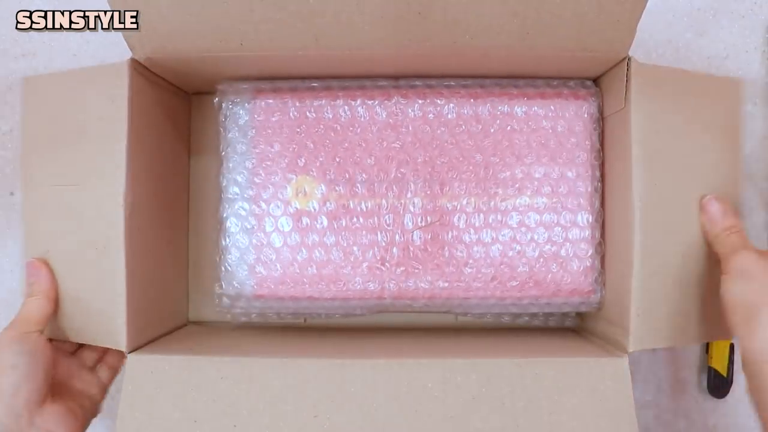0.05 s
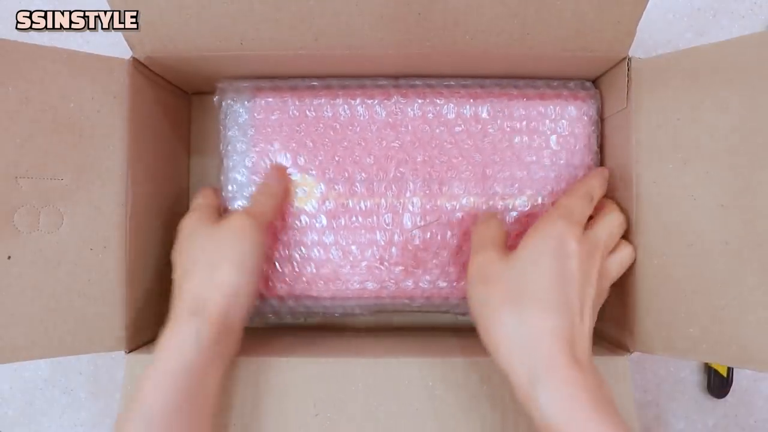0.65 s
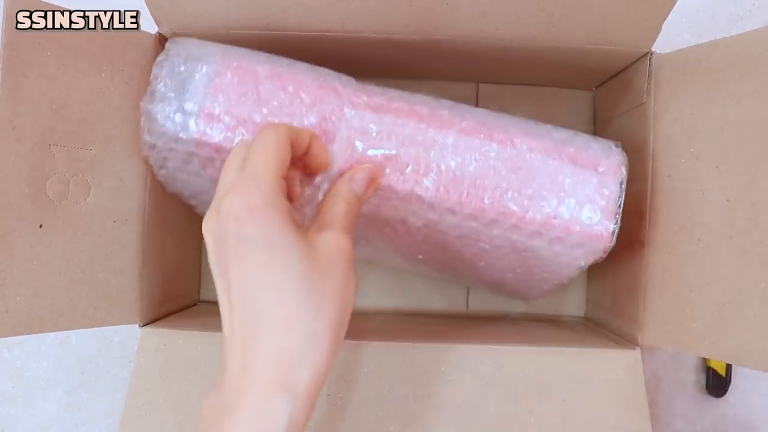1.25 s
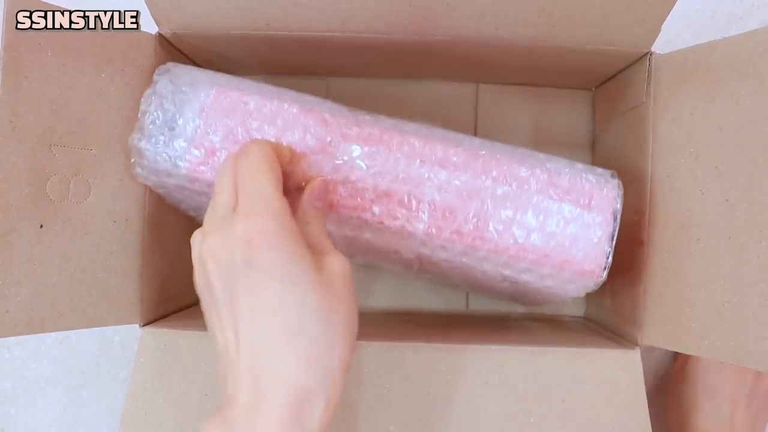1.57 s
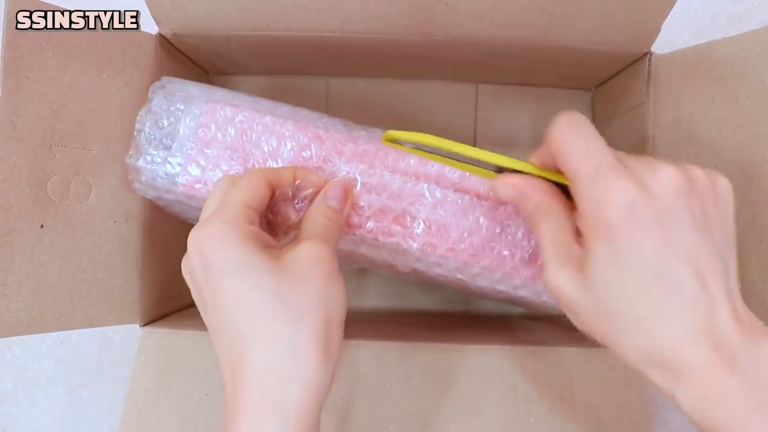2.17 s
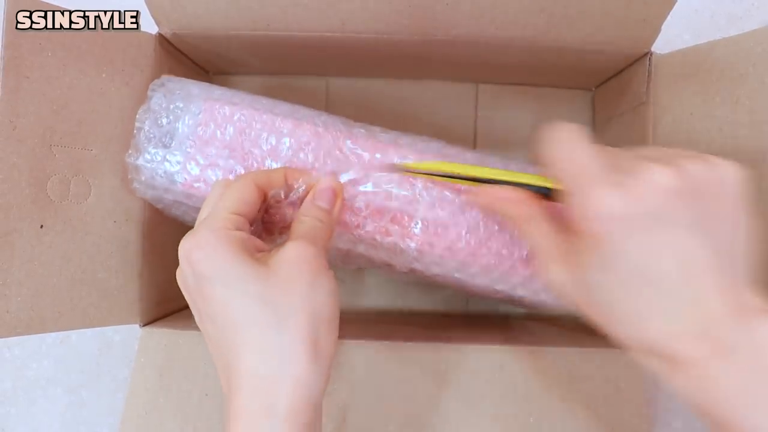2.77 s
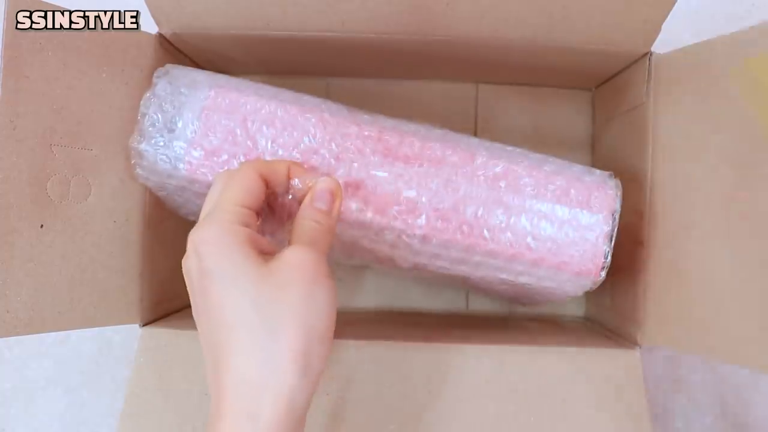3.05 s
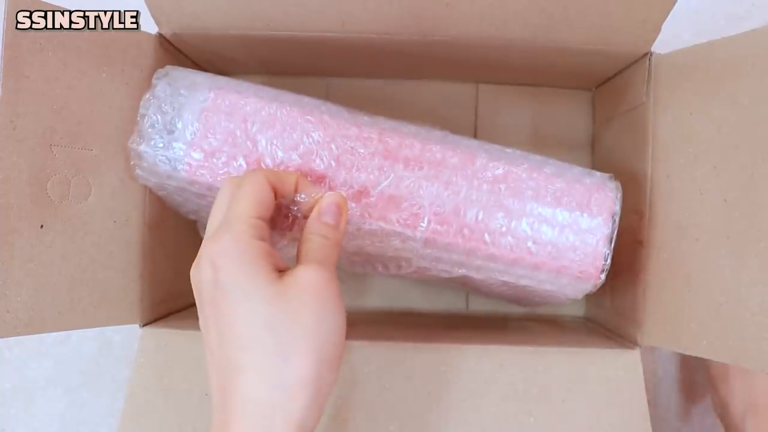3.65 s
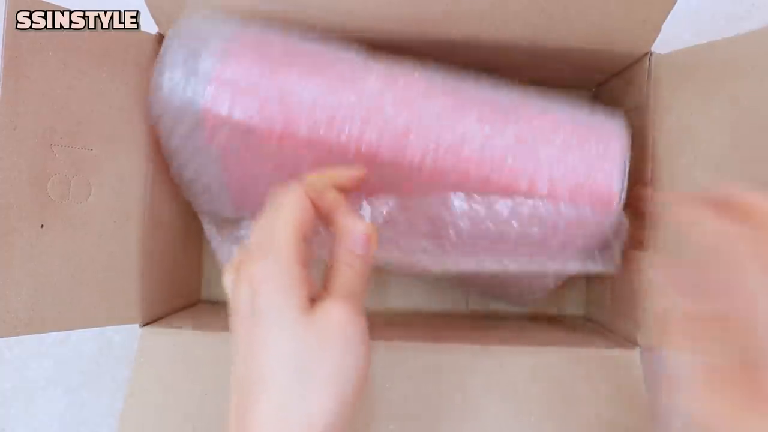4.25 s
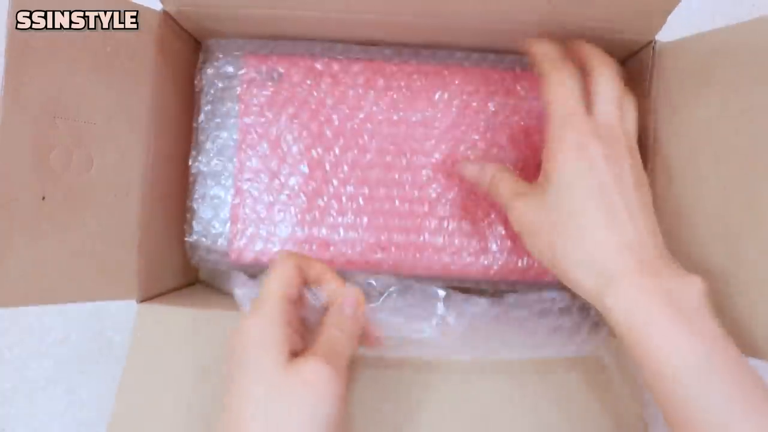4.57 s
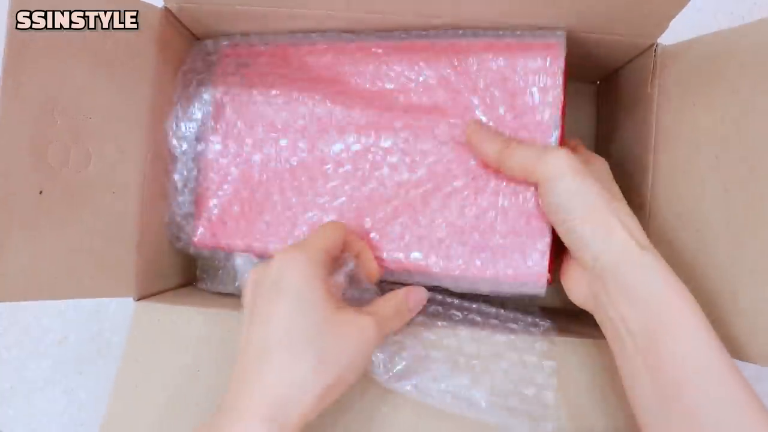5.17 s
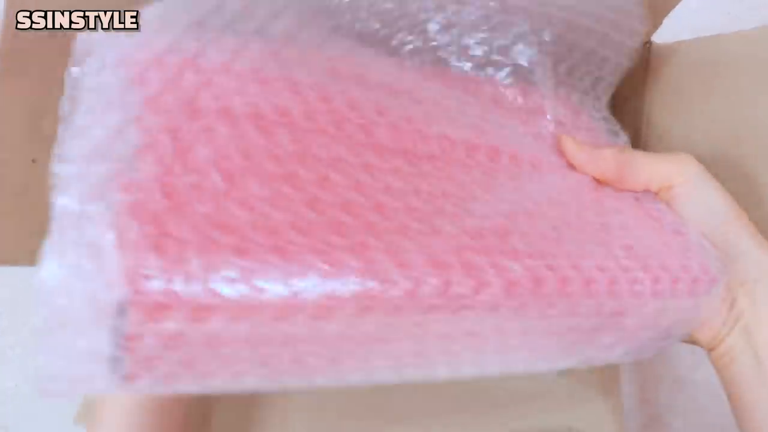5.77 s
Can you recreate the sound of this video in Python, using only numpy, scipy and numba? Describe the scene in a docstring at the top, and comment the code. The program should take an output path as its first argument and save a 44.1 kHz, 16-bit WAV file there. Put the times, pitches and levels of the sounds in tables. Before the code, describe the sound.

Everything is close to the microphone in a small, quiet room. A faint rustle opens, and a knife is put down with a light clack at about 0.4 seconds. Until 1.1 seconds, hands grip a bubble-wrapped parcel, crinkling the plastic and bumping it dully against a cardboard box. Softer rustles and ticks follow. From 2.1 to 2.6 seconds a snap-off knife ratchets out in a run of bright clicks. Around 2.8 to 3.1 seconds it slits the wrap with loud, sharp snaps and small hollow pops. After a lull with faint ticking, the blade ratchets back quickly at 3.8 seconds, and the knife hits the floor with a loud, bouncing clack near 4.2 seconds. The wrap is then pulled open in dense, sustained crinkling, with thumps, taps and cardboard scuffs around 4.4 to 5.2 seconds. Brief low cardboard groans come as the parcel slides out, the crinkling easing near 6 seconds.

```python
"""Unpacking a bubble-wrapped parcel

Hands lift the parcel in a cardboard box, close to the microphone in a small room. The film crinkles
as its creases buckle; the parcel excites the box by impact and by stick-slip friction. A snap-off
knife is put down and later ratcheted out; it slits the film, is ratcheted back and is dropped on
the floor. Then the wrap is pulled open and the parcel drawn out."""
import sys
import numpy as np
from scipy import signal
from scipy.fft import rfft, irfft
from scipy.io import wavfile
from scipy.ndimage import uniform_filter1d, minimum_filter1d
from numba import njit

SR = 44100
rng = np.random.default_rng(int(sys.argv[2]) if len(sys.argv) > 2 else 0)


def to_wav(s):
    """Save 16-bit WAV."""
    ch = np.atleast_2d(s).T  # columns
    pcm = np.round(np.clip(ch, -1, 1) * 32767)  # PCM
    wavfile.write(sys.argv[1], SR, pcm.astype(np.int16))


N = 260190
TIME = np.arange(N) / SR

# The knife's slider on its way out and back:
# (time [s], treble [dB], left minus right [dB], blade buzz relative to the notch [dB])
SLIDER_TRAVEL = [(2.05, -15, 10, -29), (2.1, 0.5, 4, -26), (2.24, -1, 0.5, -35), (2.56, -10.5, 0, -35),
                 (3.81, 12.5, 10, -16.5), (3.95, 5.5, 1, -12.5)]


def undb(db):
    """Amplitude ratio of a level in decibels."""
    return 10 ** (np.asarray(db) / 20)


def unit(x):
    """Normalisation to an rms of 1."""
    return x / np.sqrt(np.mean(x ** 2))


def with_energy(x, seconds):
    """Normalisation of a burst to the energy of that many seconds at an rms of 1."""
    return x * np.sqrt(seconds * SR / np.mean(np.sum(x ** 2, axis=-1)))


def band(x, lo_hz, hi_hz, order=2):
    """Causal Butterworth band-pass."""
    edges = np.clip([lo_hz, hi_hz], 10, .48 * SR)
    return signal.sosfilt(signal.butter(order, edges, "band", fs=SR, output="sos"), x)


def colour(x, points):
    """Spectral shaping through points of (frequency [Hz], gain [dB])."""
    hz, db = np.transpose(points)
    freqs = np.arange(N // 2 + 1) * SR / N
    return irfft(rfft(x) * undb(np.interp(np.log(freqs + 1), np.log(hz), db)), N)


def stereo_noise(shape, correlation):
    """Partial coherence: left and right noise share a common part."""
    mid, side = rng.standard_normal((2, *shape))
    return np.sqrt((1 + correlation) / 2) * mid + np.sqrt((1 - correlation) / 2) * np.array([side, -side])


def wander(per_s):
    """Random drift: linear interpolation between Gaussian values."""
    step = int(SR / per_s)
    return uniform_filter1d(np.repeat(rng.standard_normal(N // step + 1), step), step)[:N]


def add(out, s, sound, pan_db=0):
    """Superposition of a sound at time s, placed by a left-minus-right level difference."""
    i = int(s * SR)
    part = (sound * undb(np.array([[pan_db], [-pan_db]]) / 2))[:, :N - i]
    out[:, i:i + part.shape[1]] += part


def ring(modes, t):
    """Free vibration of damped modes: (frequency [Hz], level [dB], T60 [s])."""
    return sum((-1) ** k * undb(db) * np.sin(2 * np.pi * hz * t) * undb(-60 * t / t60)
               for k, (hz, db, t60) in enumerate(modes))


def resound(x, modes):
    """Forced vibration: convolution with the modes' impulse response, at the rms of the drive."""
    response = signal.oaconvolve(x, ring(modes, TIME[:12000])[None], axes=1)[:, :N]
    return unit(response) * np.sqrt(np.mean(x ** 2))


@njit
def resonate(x, hz, width):
    """Second-order resonance with a moving centre frequency; width is 1/Q."""
    y, band_state, low_state = np.empty(len(x)), 0., 0.
    for i in range(len(x)):
        g = np.tan(np.pi * hz[i] / SR)
        passed = (band_state + g * (x[i] - low_state)) / (1 + g * (g + width))
        band_state = 2 * passed - band_state
        low_state += 2 * g * passed
        y[i] = width * passed
    return y


def grains(per_s, spread_db, cap_db, decay_s, bed, correlation, lo_hz, hi_hz, bands):
    """Shot noise: tiny clicks, many weak and a few strong, over a steady bed of noise."""
    total = int(per_s * N / SR)
    onsets = rng.integers(0, N, total)
    size = undb(np.minimum(spread_db * rng.exponential(size=total), cap_db))
    edges = np.geomspace(lo_hz, hi_hz, bands + 1)
    out = 0
    for lo, hi in zip(edges, edges[1:]):
        amplitudes = size * undb(3.5 * rng.standard_normal((2, total)))  # own colour and place per click
        power = np.array([np.bincount(onsets, side ** 2, N) for side in amplitudes])
        power = signal.lfilter([1], [1, -np.exp(-2 / (decay_s * SR))], power + 1e-12)
        # the hand works evenly, so only the quick crackle stays random
        power = power / uniform_filter1d(power + 1e-6, size=4000, axis=1)
        out = out + band(np.sqrt(power + bed) * stereo_noise((N,), correlation), lo, hi)
    return out


def clicks(table, rise_s, decay_s, cycles, crack_db, low_hz, correlation,
           lag_s=0, sag_per_s=0, reach_hz=2500):
    """Impulse excitation: each click is a resonance dying in a few cycles under a broadband crack."""
    out, t = np.zeros((2, N)), TIME[:1024]
    age = np.maximum(t - np.array([[0], [lag_s]]), 0)  # arrives lag_s later on the right
    attack = 1 - np.exp(-(age / rise_s) ** 2)
    envelope = attack * np.exp(-age / decay_s)
    for s, db, hz, treble_db, pan_db in table:
        pitch = hz * np.exp(-sag_per_s * undb(db) * (age - 2 * rise_s))  # harder clicks sag faster
        phase = 2 * np.pi * np.cumsum(pitch * (age > 0), axis=1) / SR
        tone = np.sin(phase) * attack * np.exp(-age * hz / cycles)
        burst = envelope * stereo_noise(t.shape, correlation)
        crack = band(burst, max(low_hz, .4 * hz), max(2 * hz, reach_hz))
        body = unit(tone) + undb(crack_db) * unit(crack)
        treble = band(envelope * stereo_noise(t.shape, correlation / 2), 6200, 16000, order=3)
        add(out, s, undb(db) * with_energy(unit(body) + undb(treble_db) * unit(treble), .002), pan_db)
    return out


def room_tone(level_db=-60.5):
    """Ambient noise: steady, partly coherent and strongest in the bass."""
    # Background spectrum: (frequency [Hz], gain [dB])
    spectrum = [(25, -27), (58, 2.5), (90, 4.5), (150, 1), (223, 8), (300, -6), (650, -14), (7000, -31),
                (16000, -70)]
    return undb(level_db) * unit(colour(stereo_noise((N,), 0.55), spectrum))


def effort(starts, lengths, levels_db, held_db, relax_db_per_s):
    """Incoherent summation: the hand strokes add their power to that of the held wrap, giving dB."""
    power = undb(held_db) ** 2
    for start_s, length_s, db in zip(starts, lengths, levels_db):
        age = TIME - start_s
        grip_s = 0.021 + 0.17 * length_s
        attack = np.sin(np.pi / 2 * np.clip(age / grip_s, 0, 1)) ** 2
        fall_db_per_s = relax_db_per_s * (1 + 0.01 / length_s)  # short scrunches settle faster
        release = undb(-fall_db_per_s * np.maximum(age - length_s, 0))
        power = power + (undb(db) * attack * release) ** 2
    return 10 * np.log10(power)


def wall_echoes(x):
    """Comb filtering: the box walls return early echoes whose paths change as the parcel moves."""
    out = x
    for delay_s in (.0011, .0018, .0029):
        path_s = delay_s * (1 + .16 * wander(4))
        out = out + .24 * np.array([np.interp(TIME - path_s, TIME, side) for side in x])
    return out


def crinkle(level_db, sizzle_db, slides_s=4.38):
    """Buckling: countless creases click; hard rubbing and sliding film merge them into a rush."""
    # Spectrum of the film: (frequency [Hz], gain [dB])
    spectrum = [(200, 2.5), (500, -24), (1000, 4), (1700, 10), (2400, 9.5), (3600, 6.5), (5000, -0.5),
                (7000, -11.5), (9000, -11.5), (11300, -15.5), (13000, -14), (16000, -22)]
    # Resonance of the film under the fingers: (time [s], frequency [Hz], strength [dB])
    fold_track = [(.47, 2200, 1), (.7, 2100, 2.5), (.92, 2060, 10.5), (1.09, 2070, -12.5), (1.16, 2800, 7),
                  (1.3, 3000, -13), (1.55, 3160, 13), (2.85, 2580, 13.5), (3.1, 2590, -9),
                  (4.301, 3860, -10.5), (5.1, 1300, -13), (5.45, 3060, -14.5), (5.75, 1870, 3.5)]
    sliding = np.clip((TIME - slides_s) / .1, 0, 1)
    rush = .2 + (.4 + 1.1 * sliding) * undb(level_db + 30)
    crackle = grains(per_s=900, spread_db=4.6, cap_db=16, decay_s=.0008, bed=rush, correlation=.1,
                     lo_hz=250, hi_hz=18000, bands=6)
    film = wall_echoes(colour(crackle / np.sqrt(1 + rush), spectrum))
    s, hz, db = np.transpose(fold_track)
    fold_hz, fold_gain = np.interp(TIME, s, hz), undb(np.interp(TIME, s, db))
    film = film + fold_gain * np.array([resonate(side, fold_hz, width=.4) for side in film])
    coarse = undb(0.98) * unit(band(film, 150, 6500, order=4)) / np.sqrt(1 + fold_gain)
    fine = undb(sizzle_db - 4) * unit(band(film, 6500, 19000, order=4))
    catching_db = 1.5 * wander(60)  # the film catches and lets go
    return undb(level_db + catching_db) * (coarse + fine)


def creases(level_db, per_s=40):
    """Isolated buckling: single creases tick at random, even while the wrap is only held."""
    out, t = np.zeros((2, N)), TIME[:256]
    for when, size, pitch, place in rng.uniform(size=(int(per_s * N / SR), 4)):
        i = int(when * (N - len(t)))
        db = .7 * min(level_db[i], -32) - 22 + 17 * size ** 3
        tone = np.sin(2 * np.pi * 2500 * 4 ** pitch * t)
        tick = (stereo_noise(t.shape, .3) + tone) * np.exp(-t / .0004)
        add(out, i / SR, undb(db) * with_energy(tick, .002), pan_db=10 * (place - .5))
    return band(out, 1800, 4900, order=1)


def scuff(level_db, flap_db=-9):
    """Sliding friction: the parcel drags over cardboard in small slips; hard drags ring the flaps."""
    # Spectrum of rubbed cardboard: (frequency [Hz], gain [dB])
    spectrum = [(120, -25.5), (220, -6), (330, 5.5), (620, -2), (1100, -1.5), (1700, -6), (3000, -17.5)]
    # Modes of the box flaps: (frequency [Hz], level [dB], T60 [s])
    flap_modes = [(701, -1, .11), (730, -2, .13), (796, 0, .12), (1000, 1, .1)]
    slips = grains(per_s=350, spread_db=3.5, cap_db=8, decay_s=.003, bed=.2, correlation=.85,
                   lo_hz=120, hi_hz=3500, bands=2)
    drag = undb(level_db - 5) * unit(colour(slips, spectrum))
    hardness = np.clip((level_db + 45) / 15, 0, 1)
    return drag + undb(flap_db) * resound(drag * hardness, flap_modes)


def snaps_and_taps():
    """Transient excitation: taut film snaps and corners tap the box; the air cushions answer low."""
    # Stretched film gives way; the broad clack at 4.26 s is the parcel flipping over: (time [s], level [dB],
    # resonance [Hz], treble [dB], left minus right [dB])
    snaps = [(0.3252, -32, 6800, -23, -10), (0.698, -25.5, 1680, -24, -7), (0.758, -22.5, 3500, 1, -3),
             (0.8327, -26, 2300, -27, -7), (0.9226, -16, 2380, -31, -5), (0.9272, -17, 2340, -27, -2),
             (0.9864, -19.5, 2310, -28, -1), (1.4032, -33.5, 6060, -6, -1), (1.4375, -20, 5730, 0, 1),
             (1.5819, -25, 4500, -26, -3), (1.6093, -24.5, 4260, -15, -2), (1.8324, -31.5, 3720, 16, -1),
             (2.005, -39, 2150, 2, 3), (2.6691, -36, 5340, 4.5, -1), (2.8056, -27, 2400, -9, -9),
             (2.8251, -5, 2244, -6, 3), (2.834, -10.5, 2730, -4.5, -7), (2.862, -25, 2590, -19, -6),
             (2.911, -12, 2620, -37, -1), (2.9173, -16.5, 2570, -8, 1), (2.928, -18, 2900, -24, -5),
             (2.9391, -15.5, 3500, -1, 4), (2.9616, -21, 2440, -25, -4), (2.9793, -15.5, 2540, -14, 1.5),
             (3.0156, -5.5, 2500, -8, -1), (3.091, -21, 1940, -7.5, 6), (3.516, -41, 3220, 5, -1),
             (3.5614, -26.5, 7240, -4, 8), (4.225, -24, 2270, -13, 2), (4.2626, -8.5, 2020, -8.5, -2),
             (4.591, -17, 3630, -27, -3), (5.0907, -21, 3100, -16, -5)]
    # A corner of the parcel meets the cardboard: columns as for the snaps
    taps = [(0.5157, -21, 746, -8.5, 7), (4.649, -11, 825, -32, -2), (4.8446, -17, 815, -11, 1),
            (4.977, -24, 1080, -19, -4), (5.1798, -10, 1390, -14.5, 0)]
    out = clicks(snaps, rise_s=0.000373, decay_s=0.0011, cycles=1.87, crack_db=-1.5, low_hz=800,
                 correlation=0.61, lag_s=.00003, sag_per_s=1130, reach_hz=4560)
    out += clicks(taps, rise_s=0.00036, decay_s=0.0012, cycles=2, crack_db=-1.5, low_hz=400,
                  correlation=0.69)
    cushion = ring([(351, 7.5, 0.019), (1040, 3, 0.02)], TIME[:3000])
    for s, db, hz, _, pan_db in snaps + taps:
        coupling = min(2200 / hz, 1) ** 2
        add(out, s, undb(db - 15.5) * coupling * cushion, pan_db)
    return band(out, 282, 13200, order=3)


def knife_impacts():
    """Impact and rebound: the knife clacks and rings in its modes while the ground thuds."""
    # The knife is put down, later lands and bounces:
    # (time [s], level [dB], resonance [Hz], treble [dB], left minus right [dB], ground thud [dB])
    landings = [(0.356, -11, 1760, -12, -3.5, -46), (4.1562, -2.5, 3420, -10.5, 10, -16),
                (4.165, -12.5, 3200, -22, -5, -22.5), (4.177, -13, 3860, -22, 10, -38),
                (4.185, -17.5, 3800, -25, 0, -50)]
    # Modes of the knife: (frequency [Hz], level [dB], T60 [s])
    knife_modes = [(350, 18, .18), (651, 17, .2), (1750, 2, .13), (5300, -1, .15)]
    out = clicks([row[:-1] for row in landings], rise_s=0.0001, decay_s=0.0019, cycles=2.5,
                 crack_db=3.5, low_hz=1150, correlation=0.22, lag_s=.00009, reach_hz=5660)
    thud = ring([(340, -1.1, 0.016), (610, -1, 0.007), (1090, 2, 0.01)], TIME[:3000])
    for s, _, hz, _, pan_db, thud_db in landings:
        # modes weaken by 12 dB per octave of distance from the clack
        excited = [(f, db - 12 * abs(np.log2(f / hz)), t60) for f, db, t60 in knife_modes]
        add(out, s, undb(-35) * ring(excited, TIME[:12000]), pan_db)
        add(out, s, undb(thud_db) * thud)
    return band(out, 220, 19000)


def bumps(below_db_per_octave=4, above_db_per_octave=9, shudder_s=0.047, contact_s=0.0014):
    """Modal response: a soft blow swings the wall once and rings nearby box modes; the flaps shudder."""
    # The parcel bumps the box: (time [s], level [dB], centre frequency of the push [Hz])
    blows = [(0.533, -23, 152), (0.554, -24, 110), (0.724, -31, 188), (0.769, -27, 118),
             (0.823, -16.5, 175), (0.991, -29.5, 119), (3.095, -35, 86), (4.386, -24, 180),
             (4.486, -30, 180), (4.638, -13.5, 142), (4.678, -23, 191), (4.723, -22, 193),
             (4.845, -14, 198), (4.89, -24, 157), (4.976, -29.5, 231), (5.648, -31.5, 88)]
    # Modes of the box: (frequency [Hz], level [dB], T60 [s])
    box_modes = [(59.7, -6.5, 0.27), (98.3, 4.5, 0.12), (117.4, 7, 0.035), (162.7, 1.5, 0.097),
                 (239.4, -8, 0.15), (303.7, 0, 0.18), (403, 3.5, 0.11)]
    mode_hz, mode_db, t60 = np.transpose(box_modes)
    out, t = np.zeros((2, N)), TIME[:12000]
    for s, db, hz in blows:
        octaves = np.log2(mode_hz / hz)
        excited_db = mode_db + octaves * np.where(octaves < 0, below_db_per_octave, -above_db_per_octave)
        tone = ring(zip(mode_hz, excited_db, t60), t) * (1 - np.exp(-t / contact_s))
        push = np.sin(2 * np.pi * hz * t) * t * np.exp(-2 * hz * t)
        shudder = band(rng.standard_normal(len(t)) * np.exp(-t / shudder_s), hz / 3, hz * 2.2)
        thud = unit(tone) + undb(-1) * unit(push) + undb(-8) * 160 / hz * unit(shudder)
        add(out, s, undb(db) * with_energy(thud, 0.011))
    return band(out, 51, 3100, order=4)


def groans():
    """Stick-slip oscillation: uneven slips at a rising rate make the cardboard hum; the wall rings on."""
    # The parcel's edge judders along a wall:
    # (time [s], duration [s], start rate [Hz], end rate [Hz], level [dB])
    judders = [(0.881, 0.024, 300, 317, -28), (5.52, 0.012, 238, 280, -25), (5.63, 0.024, 275, 310, -23),
               (5.702, 0.064, 267, 350, -29.5)]
    # Mode of the box wall: (frequency [Hz], level [dB], T60 [s])
    wall_modes = [(284.6, 0, 0.16)]
    out = np.zeros((2, N))
    for s, length_s, start_hz, end_hz, db in judders:
        progress = np.linspace(0, 1, int(length_s * SR))
        hum = np.sin(2 * np.pi * np.cumsum(start_hz + (end_hz - start_hz) * progress) / SR)
        rasp = unit(band(rng.standard_normal(len(progress)), end_hz / 2, end_hz * 1.6))
        add(out, s, undb(db) * unit(np.sin(np.pi * progress) * (hum + .3 * rasp)))
    return out + undb(-6.5) * resound(out, wall_modes)


def notches():
    """The ratchet's impulse train: each notch takes its treble and place from the slider's travel."""
    # The slider jumps a notch: (time [s], level [dB], handle resonance [Hz])
    jumps = [(2.0532, -28, 4900), (2.1019, -15, 6340), (2.122, -13.5, 6630), (2.1362, -24, 4200),
             (2.1526, -20.5, 2850), (2.1918, -18.5, 4420), (2.218, -17.5, 3430), (2.2384, -14.5, 4330),
             (2.2767, -17.5, 4880), (2.3093, -17, 4100), (2.3408, -18, 4640), (2.432, -22.5, 3460),
             (2.4745, -17.5, 3670), (2.5103, -13, 3710), (2.5599, -15.5, 3810), (3.8128, -19.5, 4500),
             (3.833, -17.5, 4500), (3.85, -13.5, 3930), (3.857, -21, 3970), (3.871, -13, 4000),
             (3.8779, -13.5, 4030), (3.892, -13, 4130), (3.8987, -15.5, 4000), (3.913, -15.5, 4870),
             (3.923, -18, 3800), (3.934, -14, 5000), (3.9428, -13, 4270), (3.951, -16, 5060)]
    times, treble_db, pan_db, _ = np.transpose(SLIDER_TRAVEL)
    return [(s, db, hz, np.interp(s, times, treble_db), np.interp(s, times, pan_db))
            for s, db, hz in jumps]


def knife_slider(retract_s=3.2, ping_hz=11800, ping_rise_hz_per_s=5900, handle_hz=5100):
    """Ratchet impacts: the slider clicks out and back; going out, steel and plastic handle also ping."""
    jumps = notches()
    out = clicks(jumps, rise_s=0.0012, decay_s=0.0015, cycles=3, crack_db=-3.5, low_hz=3040,
                 correlation=0.049, lag_s=0.000077)
    second_notch_s = jumps[1][0]
    for s, db, _, _, pan_db in jumps:
        if s < retract_s:
            # the steel pings higher as less of it is left in the handle
            steel_hz = ping_hz + ping_rise_hz_per_s * (s - second_notch_s)
            modes = [(steel_hz, db - 8, .008), (handle_hz, db - 6.5, .013)]
            add(out, s + .001, ring(modes, TIME[:1024]), pan_db)
    outward, homeward = band(out, 2350, 21000, order=8), band(out, 1240, 10000)
    return undb(1.5) * np.where(TIME > retract_s, homeward, outward)


def blade_buzz(buzz_s=0.013, tail_s=0.034, tail_db=-7):
    """Damped rattle: each notch buzzes the blade in its track and leaves a short, bright room tail."""
    out, t = np.zeros((2, N)), TIME[:10000]
    times, _, _, buzz_db = np.transpose(SLIDER_TRAVEL)
    for s, db, _, _, pan_db in notches():
        blade = unit(band(stereo_noise(t.shape, 0.13), 3300, 12000, order=3)) * np.exp(-t / buzz_s)
        tail = unit(band(stereo_noise(t.shape, 0.1), 3300, 6000, order=3)) * np.exp(-t / tail_s)
        gain = undb(db + np.interp(s, times, buzz_db))
        add(out, s, gain * (blade + undb(tail_db) * tail), pan_db)
    return out


def slit(rise_s=0.0013, t60_s=0.037):
    """Damped resonance: each bubble in the blade's path gives a hollow tock."""
    # The blade opens a bubble: (time [s], level [dB], frequency [Hz])
    bubbles = [(2.803, -26, 328), (2.91, -19.5, 373), (2.927, -16.5, 305), (2.935, -23.5, 245),
               (2.953, -24, 310)]
    out, t = np.zeros((2, N)), TIME[:3000]
    for s, db, hz in bubbles:
        add(out, s, ring([(hz, db, t60_s)], t) * (1 - np.exp(-t / rise_s)))
    return band(out, 200, 700)


def reverberation(x, t60_s=0.28, wet_db=-18.5, build_s=0.0026, top_hz=9240):
    """Diffuse field: a short exponential tail, nearly uncorrelated between left and right."""
    t = TIME[:20000]
    envelope = undb(-60 * t / t60_s) * (1 - np.exp(-(t / build_s) ** 2))
    tail = band(stereo_noise(t.shape, 0.12) * envelope, 203, top_hz, order=1)
    return undb(wet_db) * signal.oaconvolve(x, with_energy(tail, 1 / SR), axes=1)[:, :N]


def scene():
    """Superposition of wrap, box and knife with the reverberation and noise of a quiet room."""
    # A hand grips, rubs or pulls the wrap:
    # (time [s], duration [s], crinkle level [dB], sizzle re crinkle [dB], scuff re crinkle [dB])
    strokes = [(-0.02, 0.017, -43.5, 0.5, 3.5), (0.225, 0.09, -44, -2.5, -8.5),
               (0.332, 0.059, -35.5, -5.5, -7), (0.45, 0.0079, -22, -0.5, -24),
               (0.498, 0.047, -30.5, -2.5, 4), (0.567, 0.084, -37.5, 2, 1.5),
               (0.638, 0.055, -29.5, -0.5, -5.5), (0.684, 0.26, -29, -0.5, -5.5),
               (0.81, 0.026, -18.5, -23, -9), (0.892, 0.021, -15, -9.5, -24), (0.94, 0.13, -28, -3.5, -9.5),
               (1.118, 0.062, -34, 3, -18), (1.186, .11, -41.5, 7, -9.5), (1.337, 0.12, -48, 10, -7.5),
               (1.421, 0.11, -41.5, 11, -10), (1.546, 0.068, -39, 4, -9.5), (1.639, 0.082, -49.5, 6, 0),
               (1.778, 0.07, -52, 7, 8), (1.87, 0.21, -57.5, 5, -18), (2.726, 0.1, -47.5, 1.5, -7),
               (2.771, 0.2, -35.5, -1, -4.5), (2.863, 0.081, -25.5, -14, -10), (3.063, 0.042, -38, 0, 5.5),
               (3.12, 0.37, -54, 0.5, -27), (3.542, 0.036, -65, 19, -18), (4.128, 0.11, -32, -6.5, -14.5),
               (4.195, 0.14, -34.5, -7.5, -2), (4.327, 0.095, -24, -7.5, -5.5),
               (4.435, 0.093, -21.5, 0.5, -6), (4.53, 0.087, -20, -4.5, -11.5),
               (4.606, 0.12, -27.5, -7.5, 8.5), (4.687, 0.24, -28.5, -4.5, -6),
               (4.933, 0.11, -21.5, -6, -7), (5.025, 0.31, -25, -5.5, -6), (5.317, 0.22, -24, -2, -13),
               (5.527, 0.27, -34.5, -6.5, -4.5), (5.683, 0.088, -26.5, -5, -7), (5.765, 0.12, -33, 3, -8)]
    starts, lengths, db, sizzle, scuffing = np.transpose(strokes)
    crinkle_db = effort(starts, lengths, db, held_db=-61, relax_db_per_s=237)
    sizzle_db = effort(starts, lengths, db + sizzle, held_db=-63, relax_db_per_s=205.5)
    scuff_db = effort(starts, lengths, db + scuffing, held_db=-62, relax_db_per_s=286.5)
    wrap = crinkle(crinkle_db, sizzle_db - crinkle_db) + creases(crinkle_db) + snaps_and_taps() + slit()
    box = scuff(scuff_db) + bumps() + groans()
    knife = blade_buzz() + knife_slider() + knife_impacts()
    direct = wrap + box + knife
    return direct + room_tone() + reverberation(direct)


def record(dry, top_hz=15950):
    """Two closely spaced ports receive long waves alike; a quick limiter and a low-pass follow."""
    mid, side = (dry[0] + dry[1]) / 2, (dry[0] - dry[1]) / 2
    side = signal.sosfilt(signal.butter(1, 380, "high", fs=SR, output="sos"), side)
    side = undb(-0.53) * side + 0.054 * mid  # the left is a little louder
    ports = np.array([mid + side, mid - side])
    peak_gain = minimum_filter1d(1 / np.maximum(abs(ports), 1), size=41)
    limited = ports * uniform_filter1d(peak_gain, size=41)
    return signal.sosfilt(signal.ellip(10, .2, 90, top_hz, fs=SR, output="sos"), limited)


dry = scene()
out = record(dry)
to_wav(out)
```